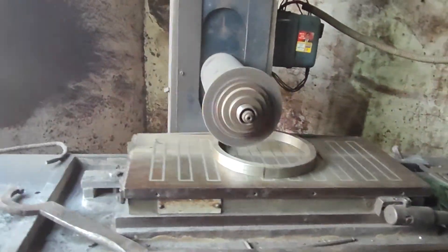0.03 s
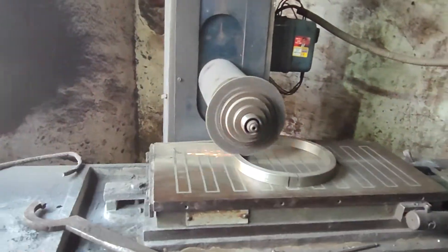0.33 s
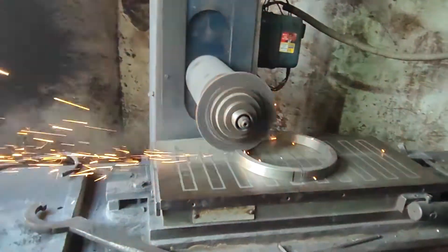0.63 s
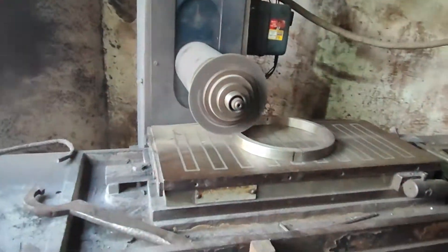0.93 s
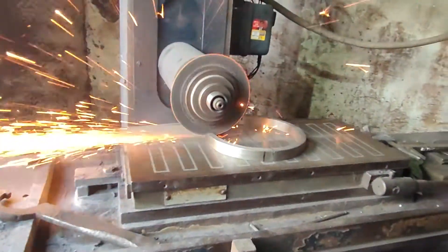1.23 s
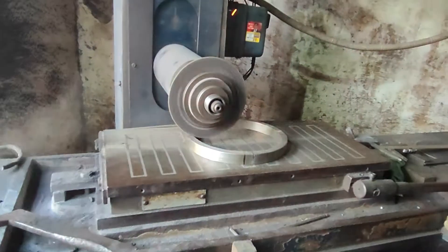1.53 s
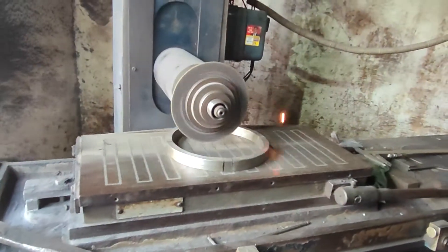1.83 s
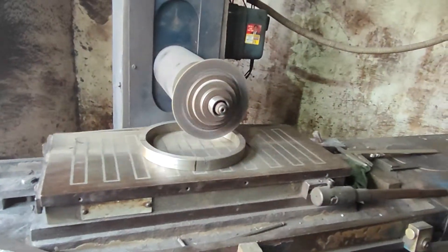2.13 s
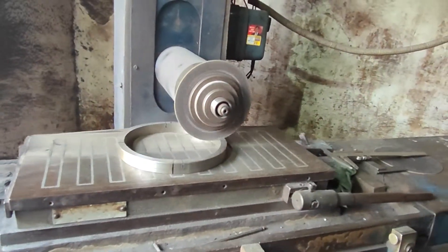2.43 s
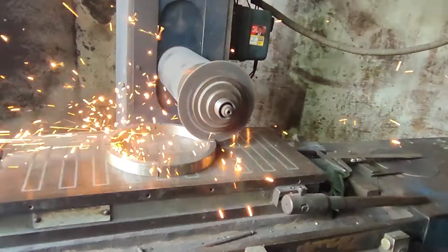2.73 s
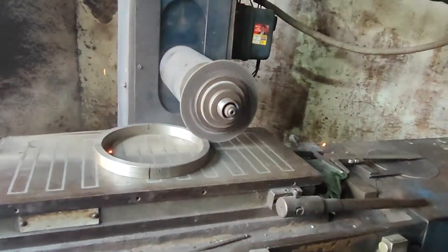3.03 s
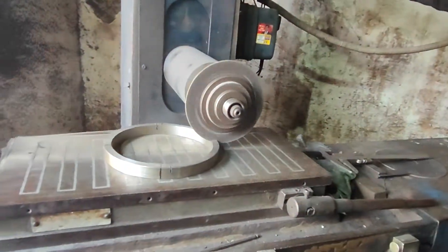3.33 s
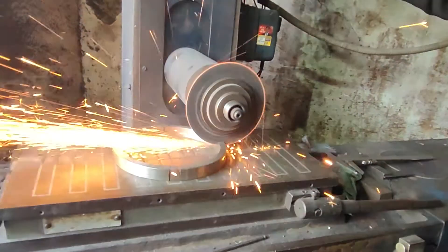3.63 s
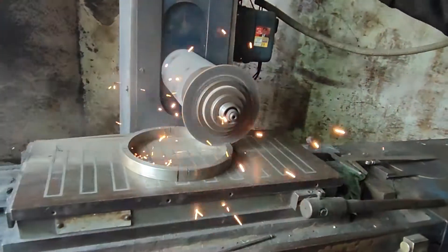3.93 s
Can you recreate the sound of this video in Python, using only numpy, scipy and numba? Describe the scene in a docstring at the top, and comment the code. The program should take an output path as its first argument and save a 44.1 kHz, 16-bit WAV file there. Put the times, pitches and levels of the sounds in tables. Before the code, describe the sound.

Harsh metal grinding comes in four bursts over a steady motor hum in a workshop. Lighter, fluttering rubbing surrounds the bursts, the steel rings faintly, and midway the machine briefly runs free between the two pairs.

```python
"""A surface grinder runs in a small workshop, its motor humming and its wheel hissing throughout.
As the table carries a steel ring under it, the wheel rubs lightly, pulsing with each turn, and the
spindle whines. Two hard bites follow, dragging the whine down and making the ring sing. The wheel then
runs free, knocks back onto the ring's edge and bites twice more, a proud grain ticking before the last
bite. Each time, the recorder's gain control ducks the hum."""
import sys
import numpy as np
from scipy import signal
from scipy.fft import rfft, irfft, next_fast_len
from scipy.io import wavfile
from scipy.ndimage import uniform_filter1d, map_coordinates
from numba import njit

SR = 44100
rng = np.random.default_rng(int(sys.argv[2]) if len(sys.argv) > 2 else 0)


def store_pcm(level_fs):
    """Save levels as 16-bit WAV."""
    pcm = np.round(np.clip(level_fs, -1, 1) * 32767).astype(np.int16)
    wavfile.write(sys.argv[1], SR, np.atleast_2d(pcm).T)


N = 176400

SPINDLE_HZ, BITE_RISE_S = 49.7, 0.017
TONE_PAN_DB = 2  # added on the left, taken off on the right
# Hard bites. Each row: start and end in seconds, first and last relative level in dB, decay in seconds.
BITES = [(0.442, 0.723, -5, -10, 0.047), (1.185, 1.415, -2, -5, 0.053), (2.597, 2.813, -7, -8.5, 0.037),
         (3.474, 3.952, -9.5, -13, 0.028)]
# Likeness of the grinding noise at the two ports. Each row: frequency in Hz, coherence from 0 to 1.
GRIND_COHERENCE = [(500, 0.24), (1600, 0.44), (2230, 0.37), (2850, 0.57), (3500, 0.47), (3900, 0.27),
                   (5200, 0.48), (7000, 0.067), (15000, 0.13)]


def grinding():
    """Countless grit impacts add up to broadband noise that grows with the contact force."""
    # Spectrum of grit cutting steel. Each row: frequency in Hz, left and right relative level in dB.
    spectrum = [(295, -71.5, -79), (700, -68, -75), (1130, -61.5, -67), (1280, -70, -77),
                (1380, -58, -58.5), (1410, -67, -71.5), (1730, -59.5, -60.5), (1910, -67, -64),
                (2300, -63, -60), (2560, -61.5, -57), (3020, -66.5, -73), (3450, -58, -55),
                (3940, -63.5, -58.5), (4490, -60, -50), (5150, -59, -45), (5010, -60, -52),
                (5400, -53, -45), (5850, -59, -53), (6640, -55.5, -58), (7150, -55, -68), (7660, -62, -83),
                (7800, -69, -69), (9060, -65, -71), (10500, -70.5, -77.5), (12400, -66, -71),
                (15600, -68, -70.5)]
    crossover_hz = 7200
    lowpass = lambda hz: 1 / (1 + (hz / crossover_hz) ** 20)
    load = biting(entry_db=2)
    source = resonances(wheel_face(load)) * amp(0.55 * wobble(220))  # chatter
    gritty = source * amp(wobble(1800))
    body = filtered(coloured(gritty, spectrum), lowpass)
    treble = filtered(coloured(source, spectrum), lambda hz: 1 - lowpass(hz)) * amp(-1)
    rub = rubbing(swing=1)
    force = np.hypot(rub, load)
    flare = np.hypot(rub, biting(entry_db=8))  # the treble flares as a bite begins
    body_knocks, treble_knocks = knocking()
    return body * (force + body_knocks + ticking()) + treble * (flare + treble_knocks) + ring(force)


def wheel_face(load):
    """The same grit returns every turn, so the low noise is partly periodic; load slows the turning."""
    sag, repeat_share, repeat_hz = 0.1, 0.76, 2620
    face = rng.standard_normal(round(SR / SPINDLE_HZ))
    turns = np.cumsum(SPINDLE_HZ * (1 - sag * uniform_filter1d(load, size=4410))) / SR
    repeating = map_coordinates(face, [turns % 1 * len(face)], mode="grid-wrap")
    share = lambda hz: repeat_share / (1 + (hz / repeat_hz) ** 4)
    periodic = filtered(repeating, lambda hz: np.sqrt(share(hz)))
    return periodic + filtered(noise_pair(GRIND_COHERENCE), lambda hz: np.sqrt(1 - share(hz)))


def biting(entry_db):
    """The force of a deep cut is greatest on entry and eases as the metal goes."""
    t, force, entry_s = clock(), np.zeros(N), 0.044
    for start, end, first_db, last_db, fall in BITES:
        level_db = np.interp(t, [start, end], [first_db, last_db])
        level_db += entry_db * np.exp(-np.maximum(t - start, 0) / entry_s)
        force += gate(start, end, BITE_RISE_S, fall) * amp(level_db)
    return force


def rubbing(swing):
    """Amplitude modulation: the uneven wheel varies the force of light contact as it turns."""
    # Light rubs. Each row: start and end in seconds, relative level in dB, a moment in seconds when
    # the high spot touches, once-a-turn and twice-a-turn swing in dB.
    rubs = [(-.01, 0.3, -28, 0.091, -1, .5), (0.292, 0.462, -11, .3, 0.5, 0.5),
            (.45, 1.194, -15.5, .986, 2.5, 1), (1.206, 1.654, -16, 1.509, 1.15, 0),
            (2.448, 2.611, -13, 2.489, -0.5, -1), (2.606, 2.991, -15.5, 2.909, -1.2, 2.7),
            (2.997, 3.506, -14, 3.21, 0.3, 0.55), (3.491, 4.055, -11, 3.712, 0.2, 1.6)]
    power = np.zeros(N)
    for start, end, db, touch, once_db, twice_db in rubs:
        angle = 2 * np.pi * SPINDLE_HZ * (clock() - touch)
        pulse_db = swing * (once_db * np.cos(angle) + twice_db * np.cos(2 * angle))
        power += (gate(start, end, rise_s=0.012, fall_s=0.016) * amp(db + pulse_db)) ** 2
    return np.sqrt(power)


def knocking():
    """Impacts of the wheel's high spot on the ring's edge give brief force pulses, body and treble."""
    # Knocks. Each row: start in seconds, relative body and treble level in dB.
    knocks = [(.299, -17, -11), (.319, -14, -10), (1.199, -5, 1), (1.644, -13, -12), (2.4475, -13, -4),
              (2.456, -9, -13), (2.4675, -6, -11), (2.4875, -2, -13), (2.528, -8, -14), (2.608, -8, 0),
              (3.484, -10, -1)]
    rise_s, fall_s = 0.0014, 0.0015
    return sum(amp([[body_db], [treble_db]]) * gate(start, start + rise_s, rise_s, fall_s)
               for start, body_db, treble_db in knocks)


def ticking():
    """A proud grain strikes once a turn, giving a pulse train of growing strength."""
    start_s, half_s = 3.22, 0.00031
    return sum(amp(db) * np.exp(-((clock() - start_s - turn / SPINDLE_HZ) / half_s) ** 2)
               for turn, db in enumerate(np.linspace(-6, -1, 6)))


def ring(force):
    """Forced resonance: the grit drives the steel ring's modes, which swell at moments."""
    # Modes. Each row: frequency and width in Hz, level against the hiss in dB, leftward pan in dB.
    modes = [(2218, 51, -18, -2), (2563, 190, -31, 0), (2874, 65, -19, -2)]
    # Swells. Each row: peak time and half-length in seconds, mode index, boost in dB.
    swells = [(0.54, 0.047, 0, 6.5), (2.719, 0.091, 0, 2.5), (3.753, 0.12, 0, 12), (.54, 0.11, 2, 6),
              (2.73, 0.033, 2, 8), (3.77, 0.16, 2, 6.5)]
    out = np.zeros((2, N))
    for k, (centre, width, db, pan_db) in enumerate(modes):
        response = lambda hz: (1j * hz * width / (centre ** 2 - hz ** 2 + 1j * hz * width)) ** 2
        mode = unit(filtered(noise_pair(GRIND_COHERENCE), response))
        boost_db = sum(up_db * np.exp(-((clock() - peak) / half) ** 2)
                       for peak, half, which, up_db in swells if which == k)
        out += mode * amp(db + boost_db) * pan(pan_db)
    return out * force


def spindle_whine():
    """A harmonic of the turn rate sounds during contact; each bite's load drags its pitch down."""
    harmonic, sag, lag_s = 22, 0.11, 0.08
    lag = np.exp(-clock()[:SR // 2] / lag_s)
    load = signal.fftconvolve(biting(entry_db=0), lag / lag.sum())[:N]
    turns = np.cumsum(SPINDLE_HZ * (1 - sag * load)) / SR
    touching = np.clip(rubbing(swing=0) / amp(-14), 0, 1)
    level = amp(-44 + 1.5 * wobble(8)) * (touching + 2 * load)
    return level * np.sqrt(2) * np.sin(2 * np.pi * harmonic * turns) * pan(TONE_PAN_DB)


def thumps():
    """Each bite gives a low thump, like a puff of air: a noise burst with exponential decay."""
    thump_hz, decay_s = 28, 0.097
    response = lambda hz: (hz / thump_hz) ** 2 / (1 + (hz / thump_hz) ** 6)
    rumble = unit(filtered(rng.standard_normal(N), response))
    puffs = sum(gate(start, start + BITE_RISE_S, BITE_RISE_S, decay_s) for start, *_ in BITES)
    return rumble * amp(-27) * puffs


def machine():
    """Rotation gives a line spectrum from motor and bearings over the broadband rush of the wheel."""
    # Motor and bearing tones. Each row: frequency in Hz, relative level in dB.
    partials = [(49.7, -55), (80.7, -51), (99.4, -55), (597, -50), (716, -51), (835, -50), (936.7, -49),
                (975, -49), (1063, -51), (1194, -50), (1335, -50), (1453, -51), (1771, -48), (1890, -44),
                (2128, -46), (2187, -47), (2368, -52), (2961, -52), (3315, -49)]
    # Passing whines. Each row: start and end in seconds, frequency in Hz, relative level in dB.
    passing = [(2.2, 2.62, 956, -42), (.72, 1.6, 452, -46), (2.9, 3.48, 1690, -43)]
    # Free-running rush. Each row: frequency in Hz, left and right relative level in dB.
    spectrum = [(25, -67, -75), (60, -67, -77), (97, -66, -76.5), (140, -62.5, -63), (322, -67.5, -69.5),
                (483, -60.5, -67.5), (670, -65, -75.5), (770, -61.5, -63.5), (1080, -60, -65.5),
                (1485, -66.5, -70), (1570, -66.5, -73), (1865, -66.5, -57.5), (2280, -72.5, -62.5),
                (3000, -69, -69.5), (3360, -63.5, -60.5), (3820, -76, -61.5), (4360, -72, -57),
                (4880, -61, -49), (5250, -71, -55.5), (5630, -61, -54), (6000, -69, -63.5),
                (6550, -70.5, -66), (7140, -57, -69), (7500, -66, -73), (7960, -87, -81),
                (8600, -81.5, -90), (11000, -88.5, -92), (15700, -88, -89)]
    # Its likeness at the two ports. Each row: frequency in Hz, coherence from 0 to 1.
    coherence = [(60, 0.2), (300, 1), (1200, 0.37), (1900, 0), (3200, 0.25), (5000, 0.34), (7000, .15)]
    hum = amp(-30) * tone(192.9, waver_db=0.45, drift_rad=0.05)
    tones = sum(amp(db + 1) * tone(hz) for hz, db in partials)
    whines = sum(amp(db) * gate(start, end, 0.044, 0.063) * tone(hz) for start, end, hz, db in passing)
    rush = coloured(resonances(noise_pair(coherence)), spectrum)
    rush *= amp(-21 + 0.75 * wobble(150) + 0.13 * wobble(8))
    return rush + (hum + tones + whines) * pan(TONE_PAN_DB)


def resonances(x):
    """Narrow resonances ripple the spectrum: some shift as the contact moves, the room's stay put."""
    shifting_db, room_db = 2.6, 1.8
    spectra = signal.stft(x, nperseg=2048)[2]
    ripple = uniform_filter1d(rng.standard_normal(spectra.shape[1:]), size=4, axis=0)
    shifting = unit(uniform_filter1d(ripple, size=5, axis=1))
    room = unit(uniform_filter1d(rng.standard_normal(spectra.shape[1]), size=2))[:, None]
    depth = np.clip(np.fft.rfftfreq(2048, 1 / SR) / 3500, .3, 1)[:, None]  # shallower in the bass
    gain = amp(depth * (shifting_db * shifting + room_db * room))
    return signal.istft(spectra * gain, nperseg=2048)[1][:, :N]


def tone(hz, waver_db=4.5, drift_rad=0.4):
    """A sine under random amplitude and phase modulation."""
    phase = 2 * np.pi * (hz * clock() + rng.random()) + drift_rad * wobble(5.04)
    return np.sqrt(2) * np.sin(phase) * amp(waver_db * wobble(6.11))


def noise_pair(coherence):
    """Two white noises whose coherence is set by the balance of mid and side."""
    angle = lambda hz: np.arccos(np.clip(along(coherence, hz), -1, 1)) / 2
    balance = lambda hz: np.array([np.cos(angle(hz)), np.sin(angle(hz))])
    mid, side = filtered(rng.standard_normal((2, N)), balance)
    return np.array([mid + side, mid - side])


def coloured(x, spectrum):
    """Spectral shaping of left and right, scaled to rms 1."""
    return unit(filtered(x, lambda hz: amp([along(spectrum, hz, 1), along(spectrum, hz, 2)])))


def filtered(x, response):
    """Linear filtering: the spectrum is multiplied by a frequency response."""
    size = next_fast_len(N + SR // 2)
    return irfft(rfft(x, size) * response(np.fft.rfftfreq(size, 1 / SR)), size)[..., :N]


def gate(start, end, rise_s, fall_s):
    """An envelope of linear attack, hold and exponential decay."""
    t = clock()
    return np.clip((t - start) / rise_s, 0, 1) * np.exp(-np.maximum(t - end, 0) / fall_s)


def wobble(rate):
    """A smooth random curve with rate knots a second."""
    return map_coordinates(rng.standard_normal(int(N * rate / SR) + 4), [clock() * rate])


def along(points, hz, column=1):
    """A table column interpolated over log frequency."""
    columns = np.transpose(points)
    return np.interp(np.log(hz + 1), np.log(columns[0] + 1), columns[column])


def pan(left_db):
    """Opposite left and right gains place a source to one side."""
    return amp([[left_db], [-left_db]])


def amp(db):
    """Decibels to amplitude ratio."""
    return 10 ** (np.asarray(db) / 20)


def unit(x):
    """Normalisation to rms 1."""
    return x / np.sqrt(np.mean(x ** 2) + 1e-20)


def clock():
    """Sample times in seconds."""
    return np.arange(N) / SR


def scene():
    """The sources superpose and reach the two microphone ports out of phase."""
    # Phase between the ports. Each row: frequency in Hz, lead of the left port in radians.
    lead = [(60, -1), (200, 0.84), (400, 0.48), (1400, 0.17), (2200, 1), (2850, 2), (3150, 3), (4200, 2.5),
            (4900, 4), (5400, 6), (5800, 9), (7000, 9), (16000, 25)]
    sound = machine() + grinding() + thumps() + spindle_whine()
    return filtered(sound, lambda hz: np.exp(.5j * along(lead, hz) * np.array([[1], [-1]])))


@njit
def follow(wanted, attack, release):
    """A first-order lag that rises at the attack rate and falls at the release rate."""
    out, now = np.zeros(len(wanted)), 0.
    for i in range(len(wanted)):
        now += (wanted[i] - now) * (attack if wanted[i] > now else release)
        out[i] = now
    return out


def record(dry):
    """Compression turns loud passages down, soft clipping rounds the peaks, and the band is limited."""
    threshold_db, slope, attack_s, release_s = -20, 0.65, 0.0086, 0.06
    ceiling, top_hz = 0.92, 15850
    power = np.abs(uniform_filter1d(np.mean(dry ** 2, axis=0), size=441))
    over_db = np.maximum(10 * np.log10(power + 1e-12) - threshold_db, 0)
    cut_db = follow(slope * over_db, 1 / (attack_s * SR), 1 / (release_s * SR))
    held = dry * amp(-0.5 - cut_db)
    rounded = held / (1 + (held / ceiling) ** 10) ** (1 / 10)
    return filtered(rounded, lambda hz: hz < top_hz)


dry = scene()
out = record(dry)
store_pcm(out)
```